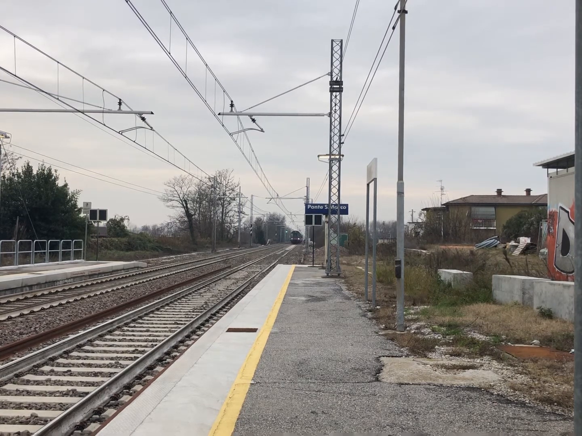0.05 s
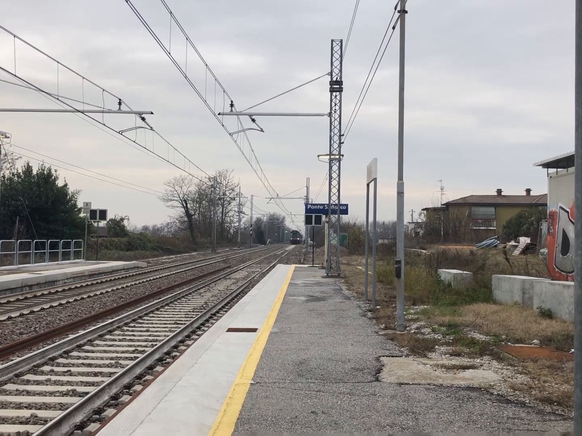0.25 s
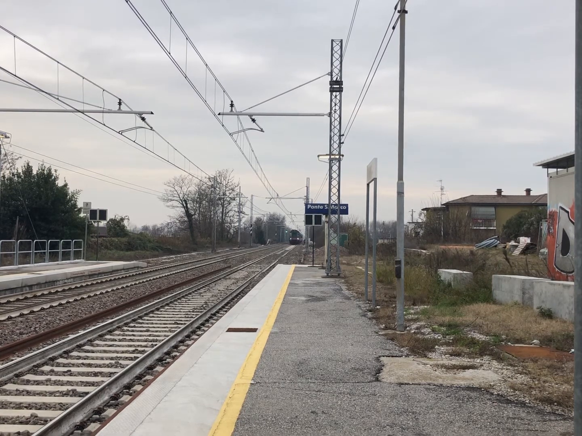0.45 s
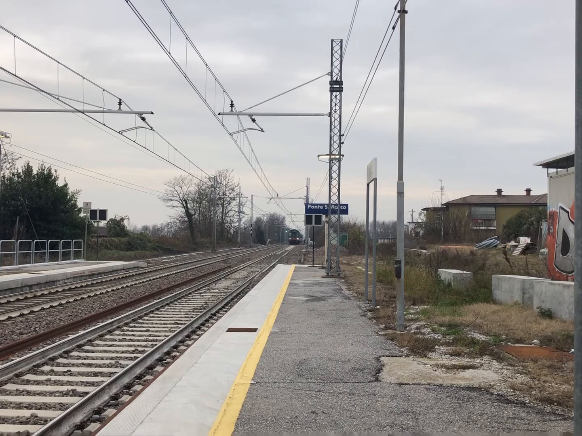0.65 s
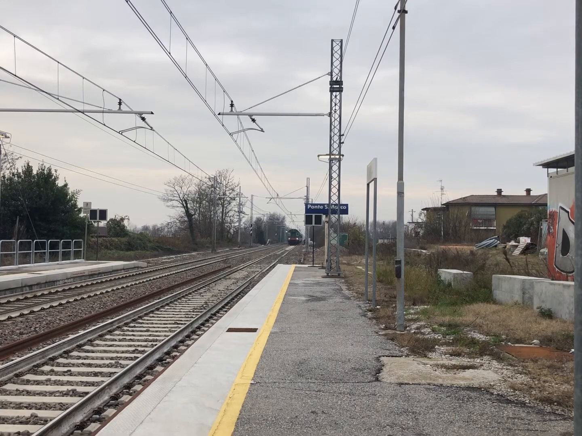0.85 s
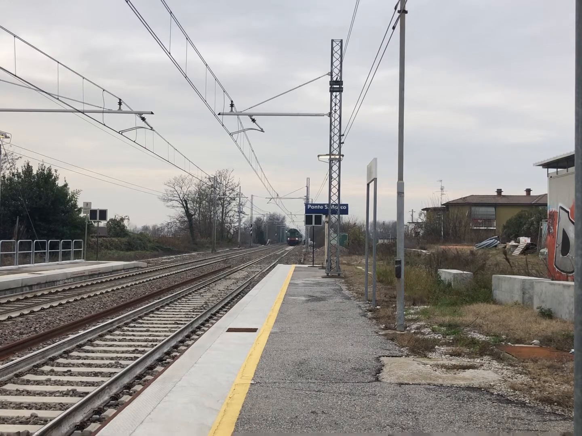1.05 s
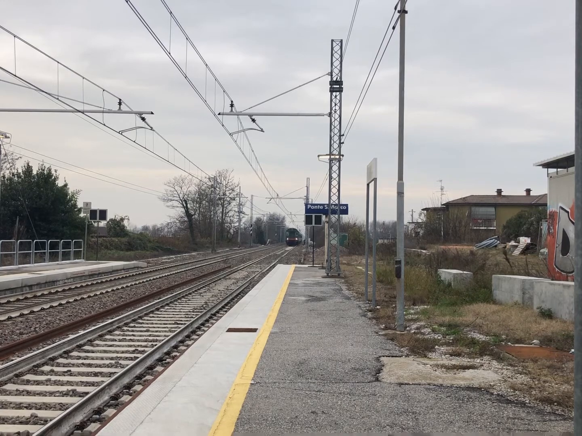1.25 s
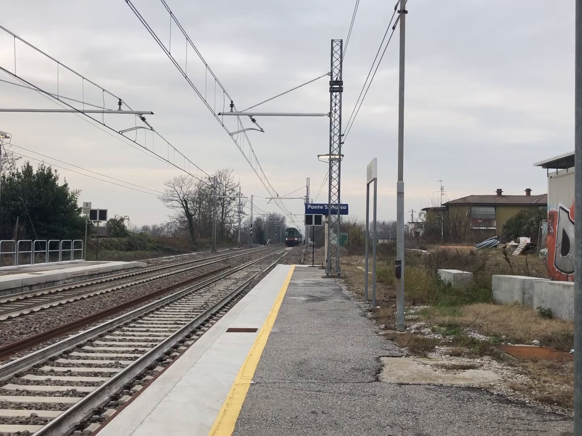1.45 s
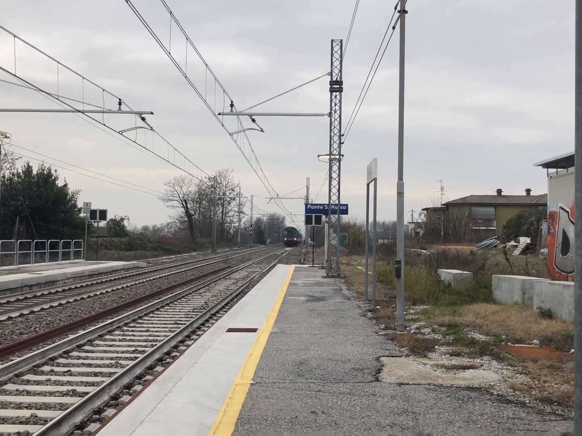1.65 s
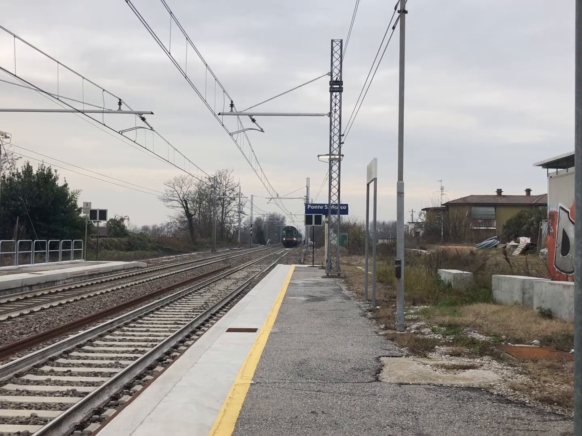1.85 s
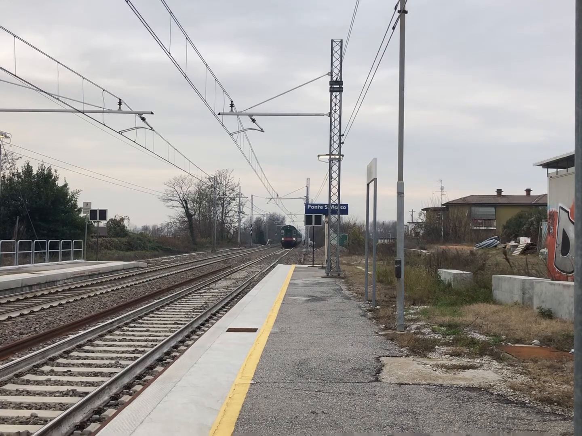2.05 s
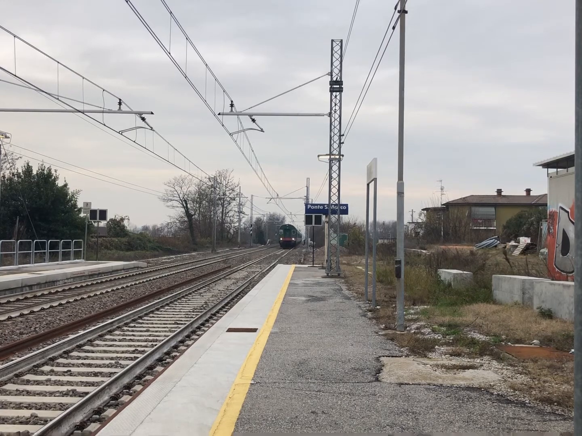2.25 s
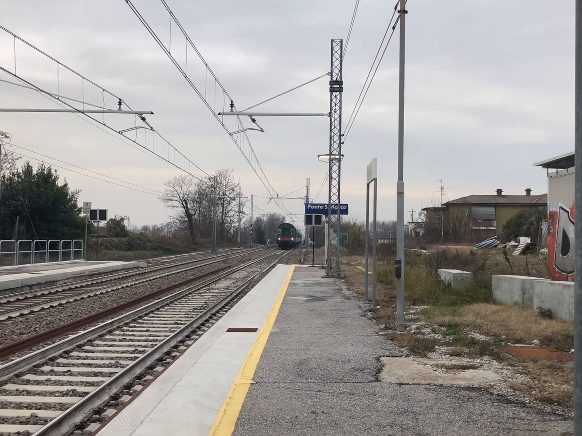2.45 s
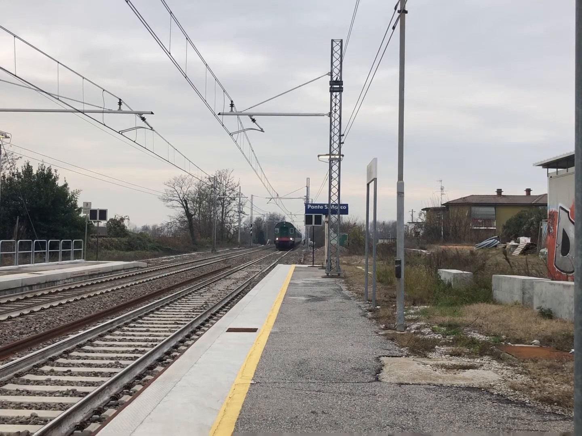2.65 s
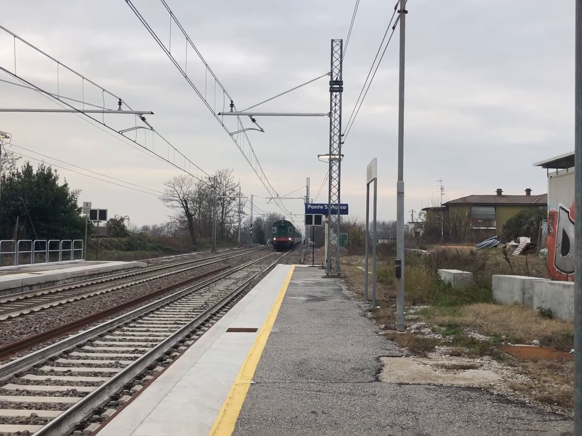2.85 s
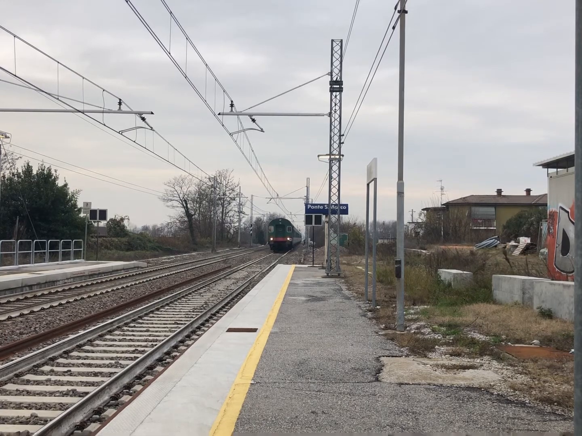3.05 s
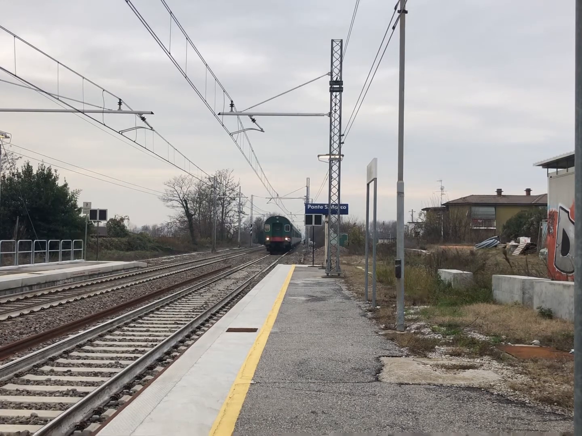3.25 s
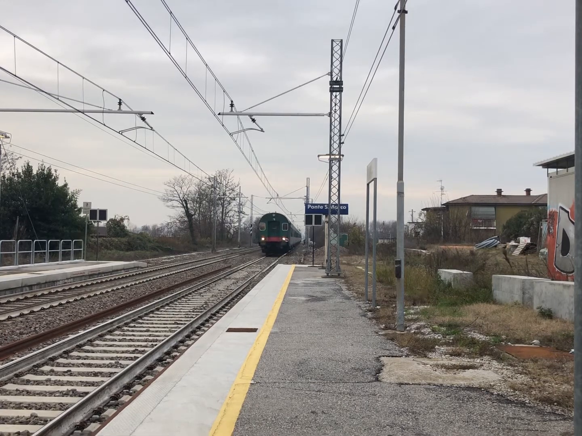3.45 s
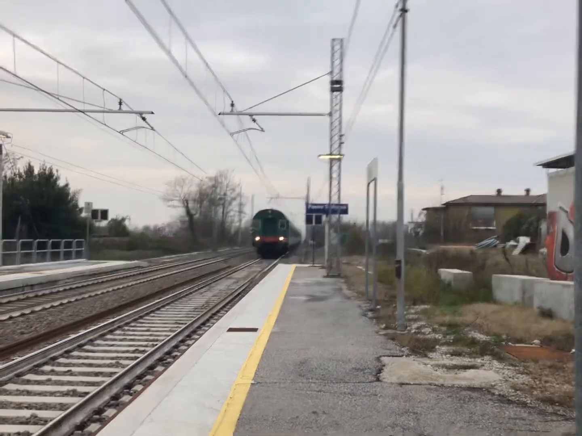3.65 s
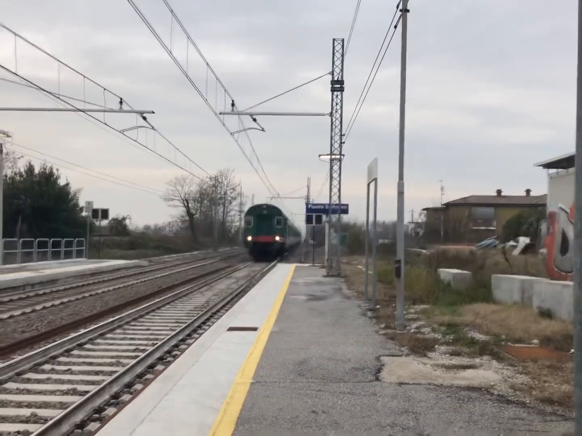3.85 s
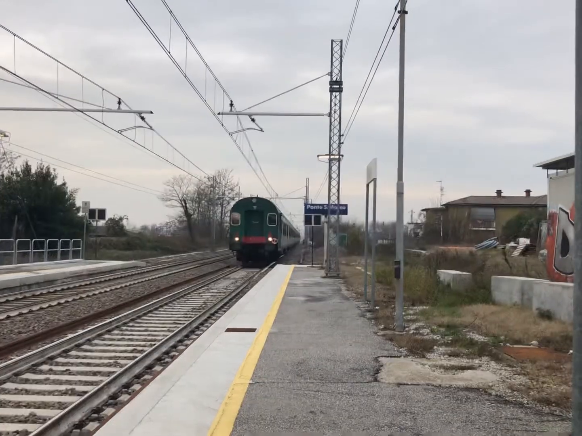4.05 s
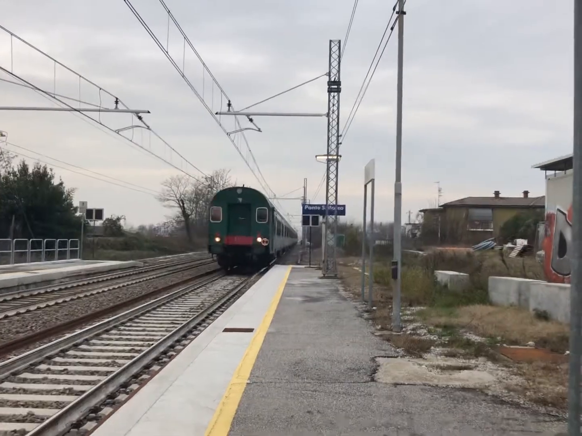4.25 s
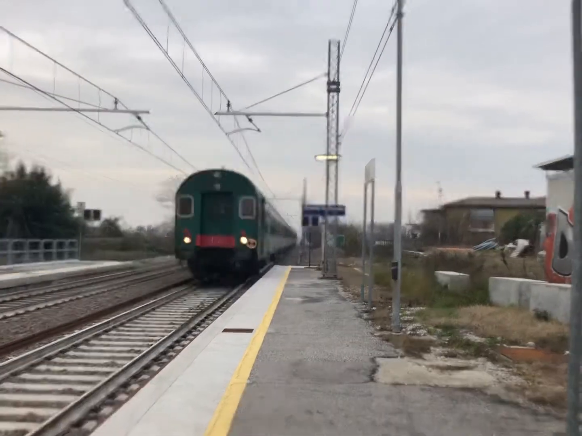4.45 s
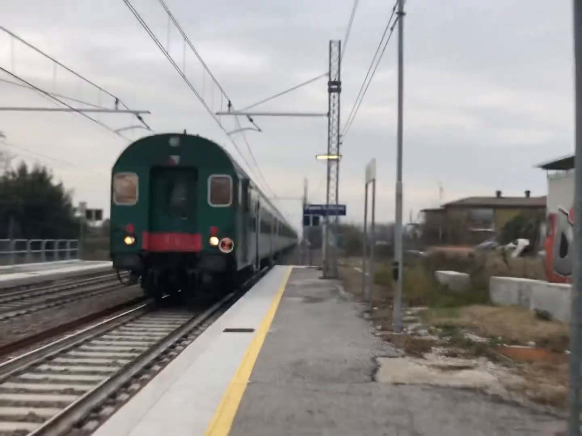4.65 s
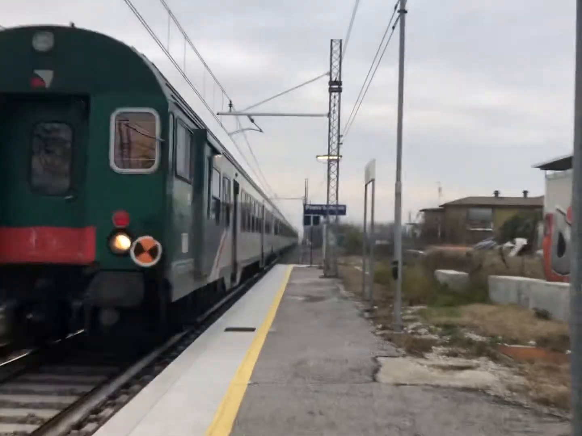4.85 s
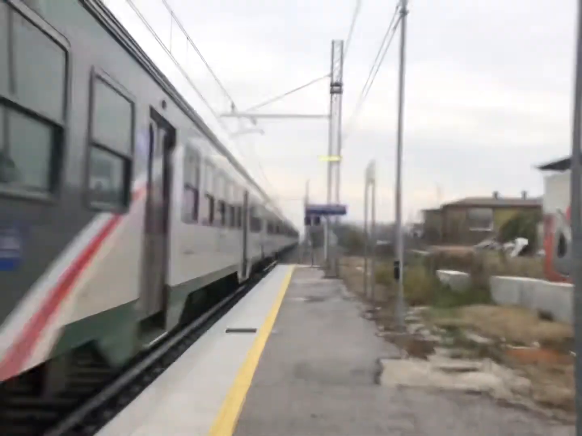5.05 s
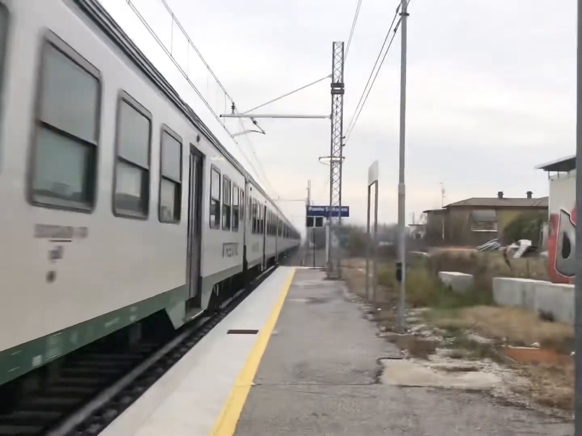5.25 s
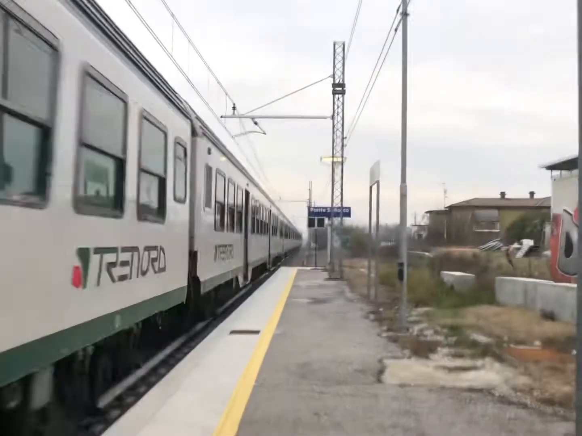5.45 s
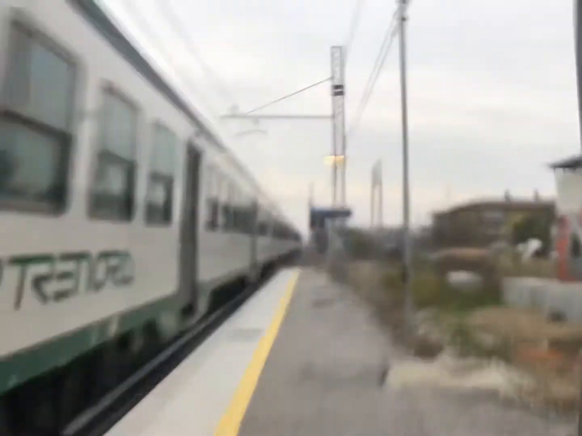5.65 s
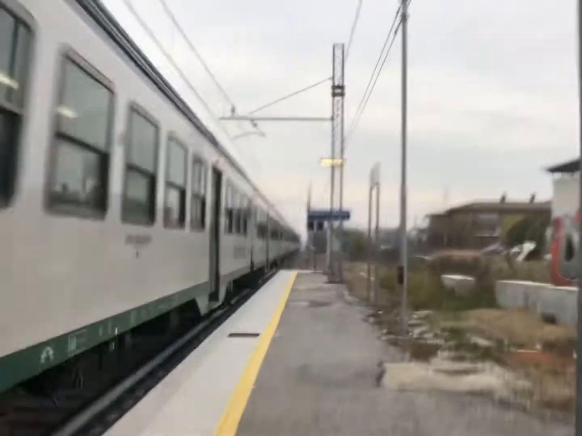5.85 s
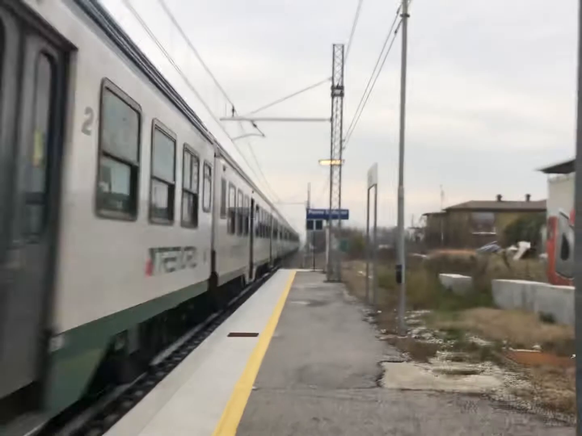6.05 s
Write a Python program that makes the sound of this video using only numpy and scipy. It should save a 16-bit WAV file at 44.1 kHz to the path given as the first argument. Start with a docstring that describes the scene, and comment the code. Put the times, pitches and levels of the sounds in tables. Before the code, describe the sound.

From the start, the rails ring with a thin metallic tone and a faint high shimmer over the low hush of open country, swelling briefly several times. An electric train is approaching the platform, and its rumble and roar grow steadily. A hiss steps up at about 2.7 seconds. Between 4 and 4.4 seconds the wheels cross a rough stretch of rail with about six quick knocks and a wavering whine. The front of the train passes close by at about 4.9 seconds, loud and roaring, and sets of wheels ring past one after another, falling in pitch. From 4.8 seconds, gusts of air buffet the microphone with low thumps and tearing noise, with a brief bright sizzle near 5.2 seconds. The gusts are strongest from 5.5 to 5.8 seconds, each pushing the train's sound down. They ease by 6 seconds as the coaches roll on.

```python
"""A station platform in open country, where an electric train rushes through. The rails sing ahead of it,
and its rumble, roar and hiss grow as it comes closer. The wheels knock over a rough stretch of rail,
then the bogies (the wheeled frames under the coaches) ring past, falling in pitch.
The air dragged along by the train buffets the microphone. That drives the limiter, an automatic
volume control, which turns the train down with every strong gust."""
import sys
import numpy as np
from scipy import signal
from scipy.fft import rfft, irfft, next_fast_len
from scipy.io import wavfile
from scipy.ndimage import uniform_filter1d, minimum_filter1d, map_coordinates

SR = 44100
rng = np.random.default_rng(int(sys.argv[2]) if len(sys.argv) > 2 else 0)


def master_out(mix):
    """Clip the mix to full scale and print it as 16-bit PCM to the path in sys.argv[1]."""
    frames = np.transpose(np.atleast_2d(mix))
    ceiling = np.clip(frames, -1, 1)
    pcm = np.round(ceiling * 32767).astype(np.int16)
    wavfile.write(sys.argv[1], SR, pcm)


N = 269010
T = np.arange(N) / SR

# the low and high notes at which the rails ring: (pitch [Hz], half width [Hz], level [dB])
RAIL_LOW_NOTES = [(1042, 67, -1), (1147, 34, 3), (1225, 18, 5), (1276, 29, 5), (1341, 20, 6.5),
                  (1384, 17, 1.5), (1390, 20, -21), (1433, 4.8, 3.5)]
RAIL_HIGH_NOTES = [(5720, 84, -2.5), (7600, 140, -12), (9609, 15, 8.5), (11130, 310, -11.5),
                   (12543, 60, -17), (12780, 90, -6), (13011, 80, -11), (14583, 60, -9),
                   (14815, 100, -11.5), (15460, 170, -15)]
# moments when the low rail notes swell: (time [s], boost [dB], half width [s])
RAIL_FLARES = [(.8, 2.5, 0.083), (1.59, 6, 0.085), (2.05, 3, .12), (2.65, 1, 0.14), (3.27, 3.5, 0.17)]
# thin tones of the running gear: (pitch [Hz], waver [Hz], level [dB])
WHINE_TONES = [(298.5, 7, -9), (849, 6, -3.5), (1038, 6.05, -1.5), (1137, 5, 0)]
# wheels hitting the rough stretch: (time [s], level [dB])
KNOCKS = [(4.083, -20.5), (4.1076, -19), (4.1565, -19), (4.2754, -11.5), (4.336, -11), (4.394, -16)]
# notes of a knocked rail and sleeper: (pitch [Hz], half width [Hz], level [dB])
KNOCK_NOTES = [(229, 59, -2), (497, 93, -4.5), (750, 61, -1.5), (1035, 80, 4.5), (1110, 82, -4),
               (1340, 76, -2)]
# notes of a wheel before its motion shifts them: (pitch [Hz], half width [Hz], level [dB])
WHEEL_NOTES = [(1790, 180, 3), (2160, 150, -1.5), (2840, 160, -5), (3500, 380, -15), (5070, 1500, -14.5)]
# bogies going by: (passing time [s], rolling level [dB], ringing level [dB], upper note boost [dB])
BOGIES = [(4.901, 1, -21, 5.5), (5.09, -6, -18.5, -23), (5.431, -9.5, -21, 1.5), (5.651, -14, -30.5, 6),
          (6.1, -33, -34.5, 20)]
# tone colour of the three rolling noises, far away and close up: (frequency [Hz], level [dB])
RUMBLE_FAR = [(20, -32), (40, -11), (62, 2.5), (95, 0.5), (135, -8.5), (175, -3), (225, -8.5), (300, -10.5),
              (420, -28), (900, -60)]
RUMBLE_NEAR = [(20, -28), (42, -19), (62, -2.5), (100, 1.5), (140, -4), (220, 3), (300, 0), (430, -17),
               (900, -39)]
ROAR_FAR = [(120, -46), (330, 0), (600, 4), (900, 3), (1250, 2), (1500, -1.5), (1900, 4), (2400, 1),
            (3200, -4), (3800, -5), (5000, -13.5), (9000, -58)]
ROAR_NEAR = [(120, -10), (370, -2), (490, -0.5), (660, -0.5), (900, -2), (1200, -1.5), (1520, -8.5),
             (1950, -2), (2400, -8.5), (3300, -14), (4200, -20), (6000, -19.5), (9000, -60)]
HISS_FAR = [(1500, -32), (3500, -38.5), (4600, -6), (5600, 3.5), (6300, -1), (8200, -8.5), (10200, -12),
            (13000, -5), (15700, 1.5)]
HISS_NEAR = [(1500, -13), (3400, 0.5), (4500, 0), (5800, 1.5), (7400, -3), (9800, -5.5), (12500, -9),
             (15700, -15)]
# tone colour of air sizzling, thumping and tearing: (frequency [Hz], level [dB])
SIZZLE_COLOUR = [(3000, -25), (7000, -6), (10000, 0), (15700, 0)]
THUMP_COLOUR = [(15, -30), (35, -9), (56, 0.5), (115, 0), (200, -6), (350, -11.5), (650, -17.5),
                (1300, -27.5), (4000, -64)]
TEARING_COLOUR = [(25, 1.5), (60, 6.5), (250, 2.5), (500, 0.5), (900, -2), (1400, -5), (2000, -15.5),
                  (3000, -24.5), (5000, -37), (12000, -47.5)]
# gusts of air from the train: (start [s], length [s], level [dB])
GUSTS = [(4.814, .15, -16), (4.959, 0.078, -10.5), (5.131, 0.1, -5.5), (5.458, 0.325, -3.5),
         (5.77, .11, -12)]
# the strongest swirls of air crossing the microphone: (time [s], level [dB], rough half length [s])
SWIRLS = [(4.866, -12, 0.0093), (4.926, -5, 0.012), (5.013, -9, 0.017), (5.049, -9, 0.0061),
          (5.125, -9, 0.0054), (5.151, -5.5, 0.0083), (5.183, -13.5, 0.01), (5.456, -6.5, 0.018),
          (5.544, -1.5, .007), (5.618, -3, 0.011), (5.659, -3, 0.006), (5.69, -0.5, 0.0038),
          (5.73, 0.5, 0.0068), (5.748, -2, 0.0075), (5.766, -2, 0.0048), (5.789, -7, 0.01),
          (5.861, -13, .006)]

TRAIN_M_PER_S, SOUND_M_PER_S = 35.47, 343
FRONT_PASSES_S = BOGIES[0][0]
PASSED_DB_PER_S = 98  # how fast a sound fades once its source has gone by
ROUGH_S, ROUGH_WIDTH_S = 4.15, 0.19  # the front wheels cross the rough stretch


def amp(db):
    """Turn decibels into a gain to multiply by."""
    return 10 ** (np.asarray(db) / 20)


def unit(x):
    """Scale x to an average strength (rms) of 1."""
    return x / np.sqrt(np.mean(x ** 2) + 1e-20)


def swell(time_s, width_s):
    """A bell-shaped curve of height 1 around a moment."""
    return np.exp(-((T - time_s) / width_s) ** 2)


def wobble(rate):
    """A smooth curve through rate random values a second."""
    times = np.linspace(0, T[-1], num=12000)
    curve = map_coordinates(rng.standard_normal(4096), [times * rate], mode="wrap")
    return np.interp(T, times, curve)


def filtered(x, response):
    """Scale each frequency in x by the gain response(hz)."""
    size = next_fast_len(N + 8192)
    return irfft(rfft(x, size) * response(np.fft.rfftfreq(size, 1 / SR)), size)[:N]


def rush(colour):
    """Rushing noise shaped by rows of (frequency [Hz], level [dB])."""
    freqs, db = np.transpose(colour)
    response = lambda hz: amp(np.interp(np.log(hz + 1), np.log(freqs), db))
    return unit(filtered(rng.standard_normal(N), response))


def ringing(notes):
    """Steel shaken at random rings at its own notes."""
    def response(hz):
        peaks = (amp(db) / (1 + ((hz - pitch) / width) ** 2) for pitch, width, db in notes)
        return np.sqrt(sum(peak ** 2 for peak in peaks))
    return unit(filtered(rng.standard_normal(N), response))


def steady(x, samples):
    """Even out a noise so that every stretch of this many samples is about as strong."""
    power = np.abs(uniform_filter1d(x ** 2, size=samples))
    return unit(x / np.sqrt(power + 0.048))


def patchy(x, depth_db):
    """Uneven wheels and rails make patches of low and high sound swell and fade."""
    slices = signal.stft(x, nperseg=1024)[2]
    patches = uniform_filter1d(rng.standard_normal(slices.shape), size=3, axis=0)  # blur over pitch
    patches = uniform_filter1d(patches, size=12, axis=1)  # blur over time
    return unit(signal.istft(slices * amp(depth_db * unit(patches)), nperseg=1024)[1][:N])


def nearing(far, near, start_s, end_s):
    """Noise whose tone colour turns from far to near between two times."""
    share = np.clip((T - start_s) / (end_s - start_s), 0, 1)
    return np.sqrt(1 - share) * rush(far) + np.sqrt(share) * rush(near)


def ahead_db(top_db, loss_db_per_m, full_within_m):
    """Level of a sound that runs ahead of the train: weaker with each metre, fading after the front."""
    to_go_s = FRONT_PASSES_S - T
    extra_m = np.maximum(TRAIN_M_PER_S * to_go_s - full_within_m, 0)
    return top_db - loss_db_per_m * extra_m - PASSED_DB_PER_S * np.maximum(-to_go_s, 0)


def passing_gain(near_db, tenfold_db, nearest_m, coaches_db=-19.5):
    """Each bogie grows louder, then fades; ten times as far away it is tenfold_db quieter."""
    power = amp(coaches_db) ** 2 * (T > FRONT_PASSES_S)  # the coaches roll on steadily alongside
    for time_s, db, _, _ in BOGIES:
        distance_m = np.hypot(TRAIN_M_PER_S * np.maximum(time_s - T, 0), nearest_m)
        distance_db = tenfold_db * np.log10(distance_m / nearest_m)
        passed_db = PASSED_DB_PER_S * np.maximum(T - time_s, 0)
        power += amp(db - distance_db - passed_db) ** 2
    return amp(near_db) * np.sqrt(power)


def gust(start_s, end_s, db, rise_db_per_s=520, fall_db_per_s=480):
    """Air pressure that rises, holds from start to end, and falls."""
    return amp(db - rise_db_per_s * np.maximum(start_s - T, 0) - fall_db_per_s * np.maximum(T - end_s, 0))


def countryside(db=-55):
    """The steady low hush of the open land."""
    return amp(db) * rush([(25, -25), (60, 6), (130, 2), (200, -2), (330, 3.5), (480, 2.5),
                           (750, -8.5), (1500, -12), (6000, -49)])


def rail_song():
    """Vibration travels far ahead of the train at the few pitches that the rails carry well."""
    flares_db = sum(db * swell(time_s, width_s) for time_s, db, width_s in RAIL_FLARES)
    low_db = ahead_db(-37, loss_db_per_m=0.14, full_within_m=36) + flares_db
    high_db = ahead_db(-59.5, loss_db_per_m=0.081, full_within_m=72)
    low = amp(low_db + 0.76 * wobble(13)) * ringing(RAIL_LOW_NOTES)
    high = amp(high_db + 0.59 * wobble(9.1)) * ringing(RAIL_HIGH_NOTES)
    return low + high


def whine(rough_boost_db=14):
    """Thin wavering tones of the running gear carry ahead and cry out on the rough stretch."""
    tones = np.zeros(N)
    for hz, waver_hz, db in WHINE_TONES:
        gain = amp(db + 2.7 * wobble(11))
        pitch_hz = hz + waver_hz * wobble(45)
        tones += gain * np.sin(2 * np.pi * np.cumsum(pitch_hz) / SR)
    level_db = ahead_db(-40.5, loss_db_per_m=0.28, full_within_m=48)
    return amp(level_db + rough_boost_db * swell(ROUGH_S, ROUGH_WIDTH_S)) * unit(tones)


def sizzle(db=-32):
    """A brief bright rush of air as the side of the first coach sweeps by."""
    return amp(db) * swell(time_s=5.22, width_s=0.11) * rush(SIZZLE_COLOUR)


def clatter(boost_db=1, attack_s=0.0028, ring_s=0.094):
    """Each knock briefly rings the rail and the sleeper, the beam beneath it."""
    blows = np.zeros(N)
    age = np.arange(SR // 4) / SR
    rise = 1 - np.exp(-age / attack_s)
    for time_s, db in KNOCKS:
        blows[round(time_s * SR):][:len(age)] += rise * amp(boost_db + db - 60 * age / ring_s)
    return blows * steady(ringing(KNOCK_NOTES), samples=400)


def wheel_ring(nearest_m=4):
    """Wheels ring higher coming and lower leaving, as their sound's travel time shrinks and grows."""
    out = np.zeros(N)
    for time_s, _, db, boost_db in BOGIES:
        distance_m = np.hypot(TRAIN_M_PER_S * (T - time_s), nearest_m)
        heard_at = T + (distance_m - nearest_m) / SOUND_M_PER_S
        upper_notes = [(hz, width, level + boost_db) for hz, width, level in WHEEL_NOTES[1:]]
        ring = steady(ringing(WHEEL_NOTES[:1] + upper_notes), samples=1500)
        # the platform edge screens the wheels until they are close
        gain = amp(db) * (nearest_m / distance_m) ** 1.88
        out += np.interp(T, heard_at, gain * ring, left=0)
    return out


def rolling():
    """Sleepers rumble, wheels roar and hiss where they touch the rail; all shake as the wheels turn."""
    shake = wobble(28)
    rough = swell(ROUGH_S, ROUGH_WIDTH_S)
    rumble = nearing(RUMBLE_FAR, RUMBLE_NEAR, start_s=3.25, end_s=4.68)
    rumble *= amp(rough + 0.5 * shake) * passing_gain(-17, tenfold_db=26.74, nearest_m=9.13)
    roar = patchy(nearing(ROAR_FAR, ROAR_NEAR, start_s=3.2, end_s=4.73), depth_db=1.35)
    roar *= amp(2.5 * rough + 0.35 * shake) * passing_gain(-14, tenfold_db=30.02, nearest_m=8.75)
    hiss = patchy(nearing(HISS_FAR, HISS_NEAR, start_s=2.56, end_s=2.78), depth_db=3.0)
    hiss *= amp(3.5 * rough + 0.16 * shake) * passing_gain(-22, tenfold_db=23, nearest_m=5.08)
    hiss *= amp(np.interp(T, [2.68, 2.767], [-6, 0]))  # quieter at first, then it steps up
    return rumble + roar + hiss


def slipstream(swing_limit=3.4, breakup=0.76, churn_db=-14):
    """The train's air pushes on the microphone in low thumps, and swirls tear across its opening."""
    # a light draught fills the gaps between the gusts
    draught = gust(GUSTS[0][0], end_s=5.96, db=-31, rise_db_per_s=130, fall_db_per_s=130)
    gusts = [gust(start_s, start_s + length_s, db) for start_s, length_s, db in GUSTS]
    pressure = np.max([draught] + gusts, axis=0)
    corners = np.array([-1.2, -0.8, 0.4, 1.5])  # a swirl rises fast, holds, then falls more slowly
    swirls = sum(amp(db) * np.interp(T, time_s + half_s * corners, [0, 1, 1, 0])
                 for time_s, db, half_s in SWIRLS)
    # a swirl breaks up the thump it rides on
    thumps = pressure * steady(rush(THUMP_COLOUR), samples=700) / (1 + breakup * swirls)
    # small swirls churn at random between the big ones
    churn = pressure * amp(churn_db + 4 * wobble(70))
    tearing = (swirls + churn) * amp(4.05 * wobble(500)) * steady(rush(TEARING_COLOUR), samples=150)
    air = thumps + tearing
    # the microphone's membrane can only swing so far
    return air / (1 + (air / swing_limit) ** 4) ** (1 / 4)


def scene():
    """Everything that reaches the platform, in one channel."""
    land = countryside()
    train = rolling() + rail_song() + whine() + clatter() + wheel_ring()
    air = sizzle() + slipstream()
    return (land + train + air)[None]


def limiter(x, ceiling, release_db_per_s):
    """Turn the volume down at once on a peak above the ceiling, then let it climb back."""
    needed_db = -20 * np.log10(np.maximum(np.abs(x) / ceiling, 1))
    over_db = -minimum_filter1d(needed_db, size=90)  # hold each peak for about 2 ms
    recovery_db = release_db_per_s * T
    cut_db = np.maximum.accumulate(over_db + recovery_db) - recovery_db
    return x * amp(-uniform_filter1d(cut_db, size=90))


def record(dry, low_cut_hz=28, top_hz=15720):
    """The recorder trims the deepest bass, limits and rounds off peaks, and drops the highest treble."""
    x = filtered(dry[0], lambda hz: 1 / np.sqrt(1 + (low_cut_hz / (hz + 1)) ** 8))
    x = limiter(x, ceiling=1.057, release_db_per_s=73)
    x = limiter(x, ceiling=1.05, release_db_per_s=400)
    x = x / (1 + np.abs(x / 0.98) ** 8) ** (1 / 8)
    return filtered(x, lambda hz: hz < top_hz)[None]


dry = scene()
out = record(dry)
master_out(out)
```